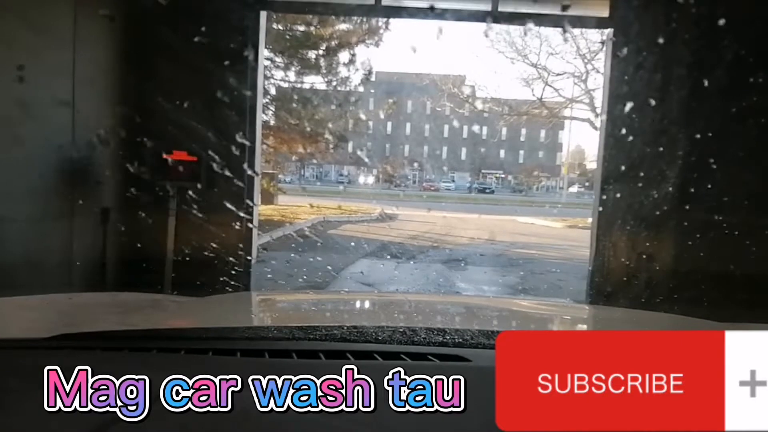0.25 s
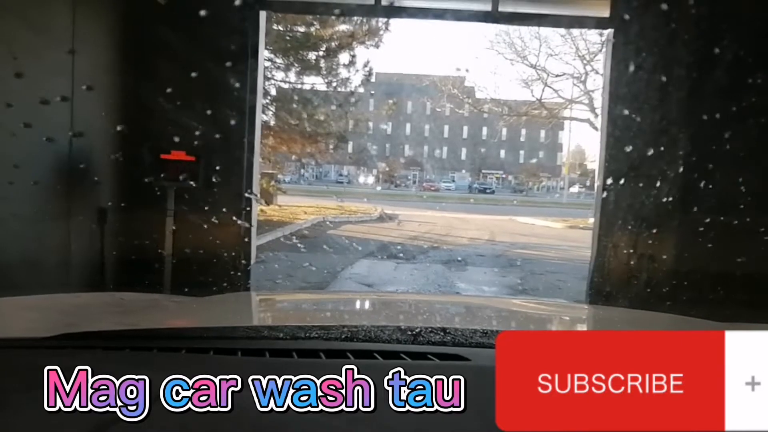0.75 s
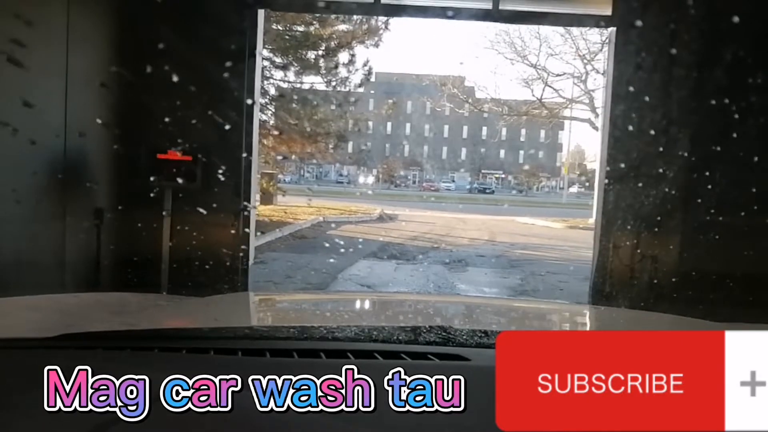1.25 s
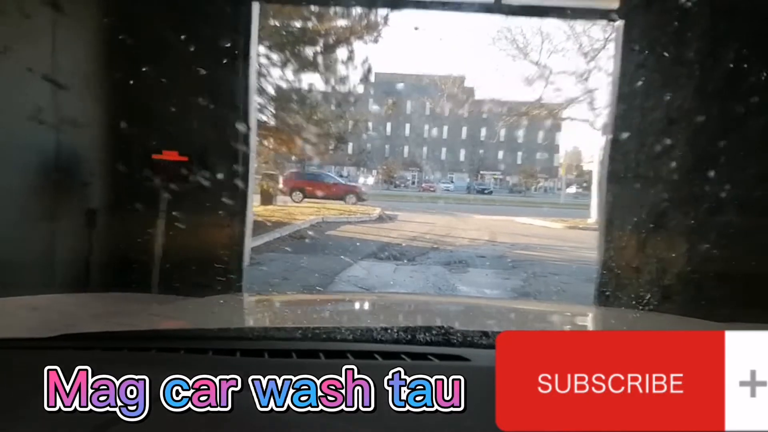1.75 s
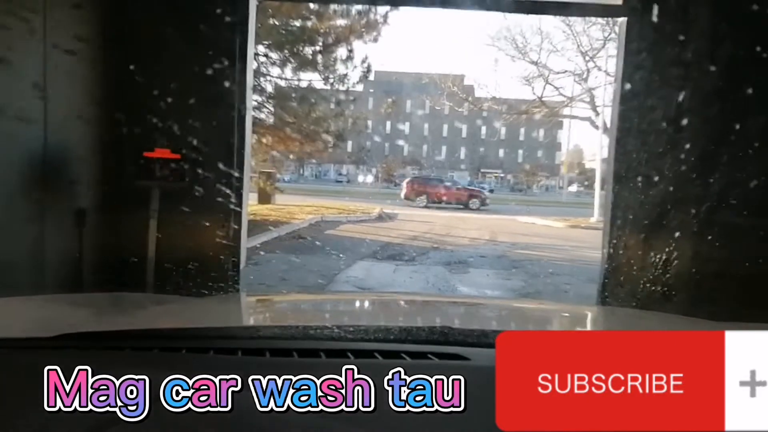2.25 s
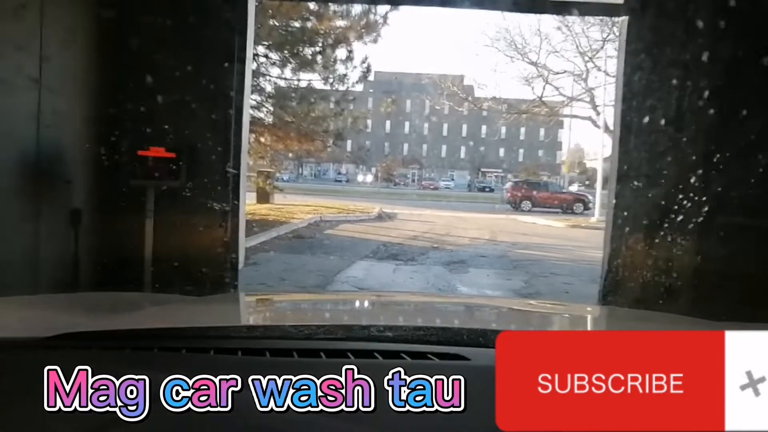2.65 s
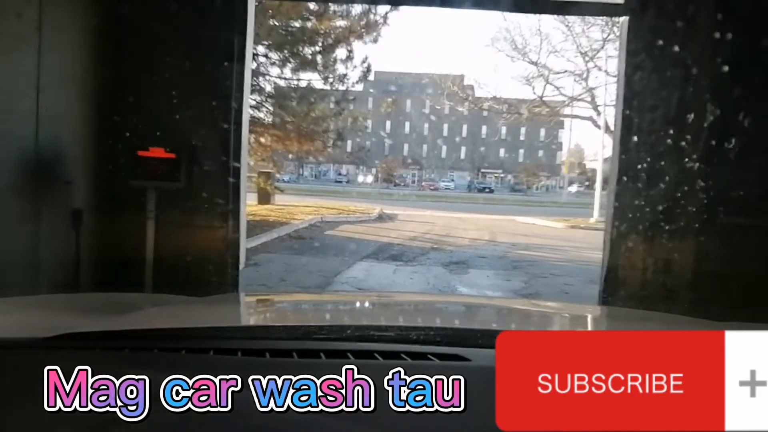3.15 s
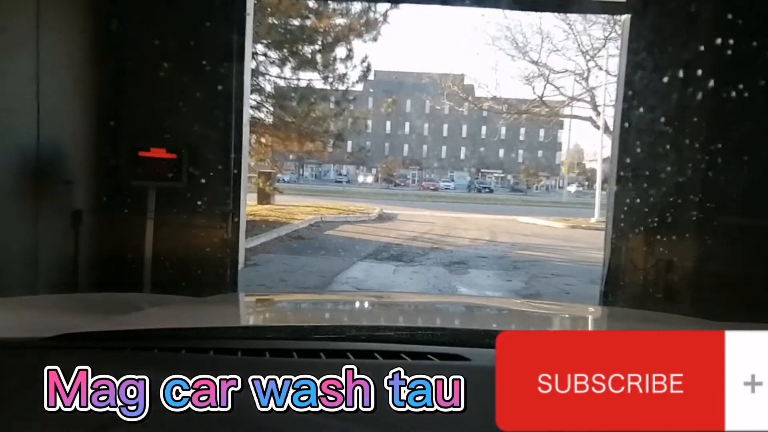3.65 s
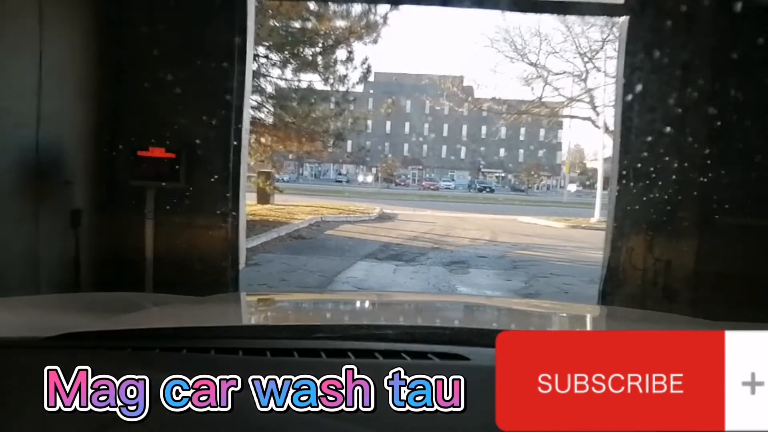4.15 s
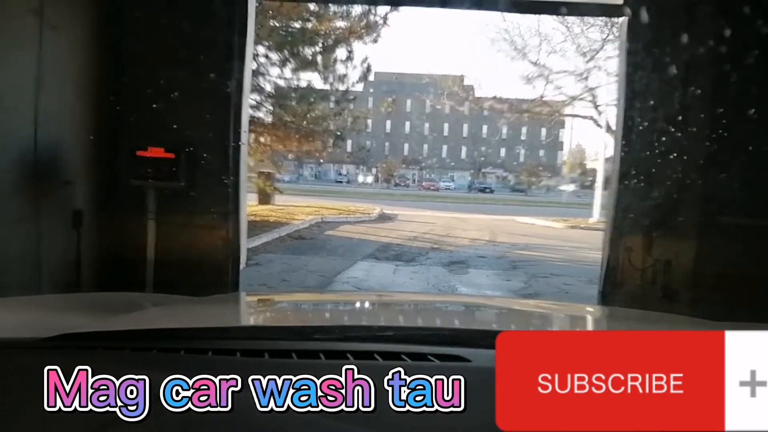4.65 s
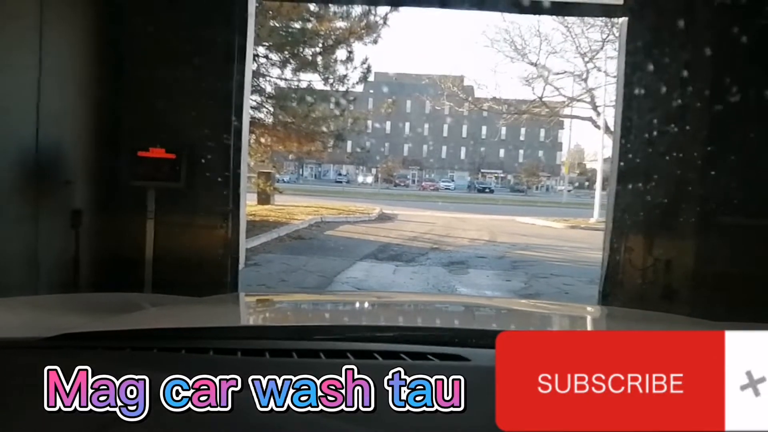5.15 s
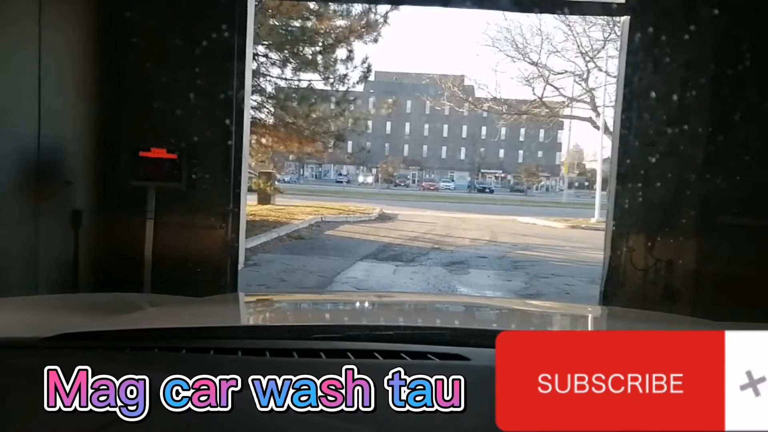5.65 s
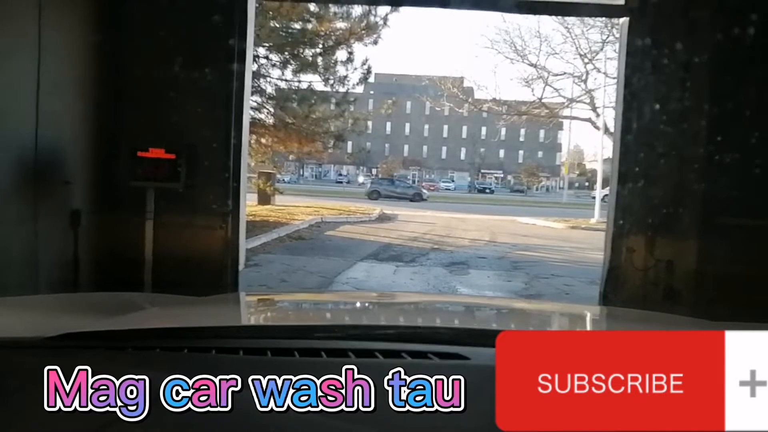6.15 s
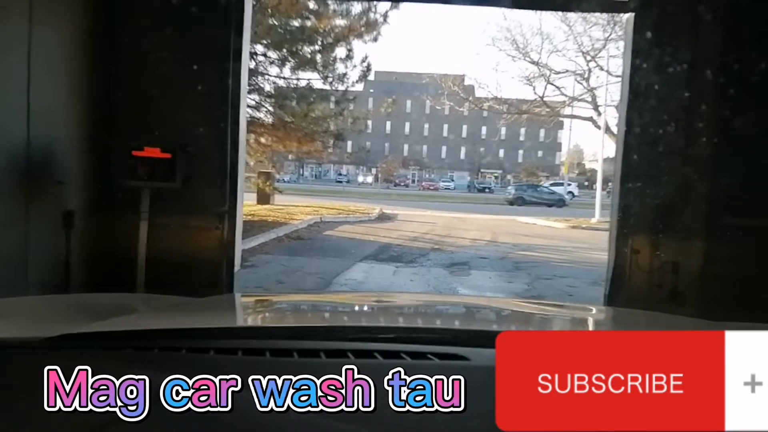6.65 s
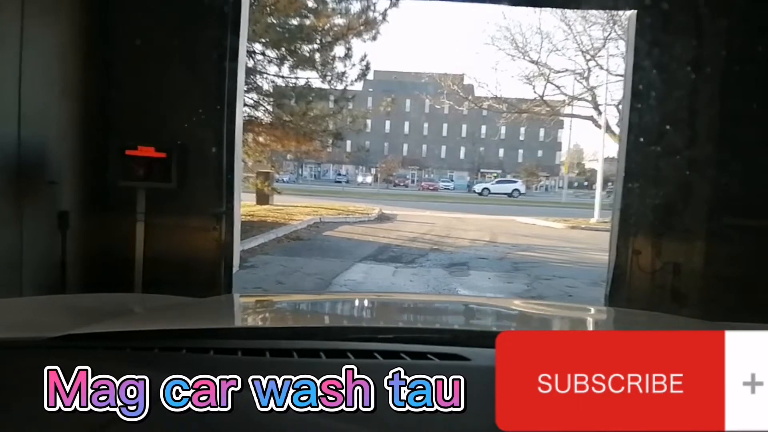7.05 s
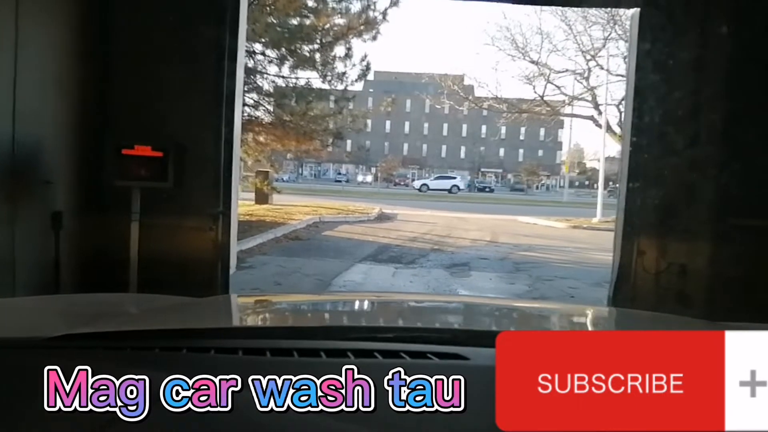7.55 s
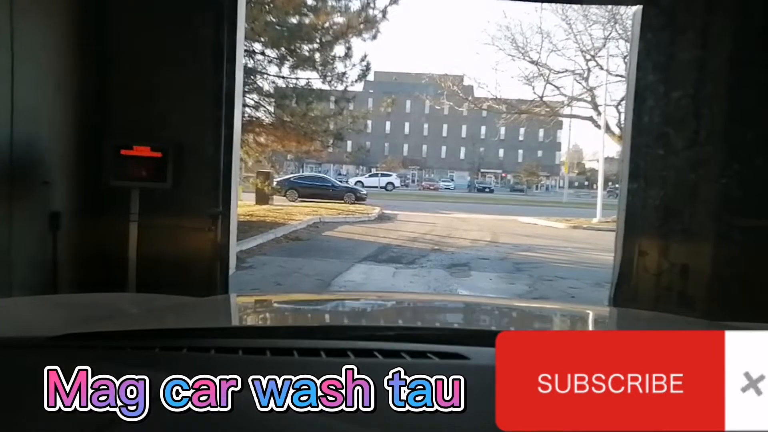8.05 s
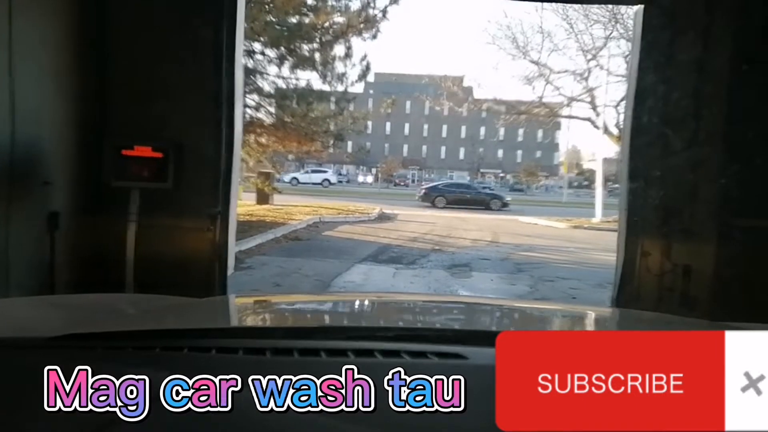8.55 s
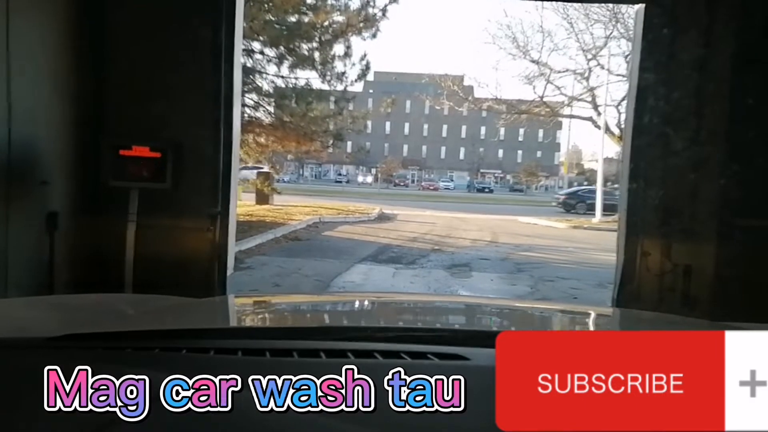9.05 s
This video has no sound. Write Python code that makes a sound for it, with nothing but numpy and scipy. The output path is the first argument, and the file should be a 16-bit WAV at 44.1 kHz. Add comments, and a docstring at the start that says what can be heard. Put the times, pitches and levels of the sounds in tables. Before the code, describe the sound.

Loud blower rush and deep cabin boom in a car wash, with fluttering gusts, faint fan hum, steady hiss and a few small dry ticks.

```python
"""Car-wash dryers heard inside a creeping car

Air jets pound the body and make the cabin boom in surges: band-shaped noise with pitched throbs.
Their gusty rush, puffs and squalls on the windscreen are noise with random gains and resonances.
Behind lie a steady hiss with a hollow ring, shaped by glass, and the fans' wavering narrow-band tone.
Small dry ticks, and a few faint rustles that lean left, are short envelopes on bright noise.
"""
import sys
import numpy as np
from scipy import signal
from scipy.fft import rfft, irfft
from scipy.io import wavfile
from scipy.ndimage import uniform_filter1d

SR = 44100
rng = np.random.default_rng(int(sys.argv[2]) if len(sys.argv) > 2 else 0)


def generate_wav(signal):
    """Clip the signal to [-1, 1] and save it as 16-bit WAV at the path in sys.argv[1]."""
    frames = np.transpose(np.atleast_2d(signal))
    scaled = np.clip(frames, -1, 1) * 32767
    pcm = np.round(scaled).astype(np.int16)
    wavfile.write(sys.argv[1], SR, pcm)


N = 409688
T, HZ = np.arange(N) / SR, np.fft.rfftfreq(N, 1 / SR)  # time (s) and frequency (Hz) axes


def amp(db):
    """Logarithmic level: decibels to amplitude gain."""
    return 10 ** (np.asarray(db) / 20)


def evened(x):
    """Normalization: scales to rms 1."""
    return x / np.sqrt(np.mean(x ** 2) + 1e-20)


def read(points):
    """Interpolation: a spectrum table on a logarithmic frequency axis."""
    hz, value = np.transpose(points)
    return np.interp(np.log(HZ + 1), np.log(hz), value)


def shape(points, fall_db=30):
    """Spectral envelope: gain of a table, falling by fall_db more per octave past its last point."""
    octaves = np.log2(np.maximum(HZ / points[-1][0], 1))
    return amp(read(points) - fall_db * octaves)


def level(rows, axis=1):
    """Amplitude envelope: gain over time from one decibel column."""
    rows = np.array(rows)
    return amp(np.interp(T, rows[:, 0], rows[:, axis]))


def peak(hz, width_hz):
    """Resonance: a bell-shaped response, width_hz wide at half its height."""
    return 1 / (1 + (2 * (HZ - hz) / width_hz) ** 2)


def bump(middle_s, half_s):
    """Gaussian envelope: a smooth swell from near 0 to 1 and back."""
    return np.exp(-np.minimum(((T - middle_s) / half_s) ** 2, 20))


# Likeness of the left and right sound fields: pitch_hz, correlation (-1 to 1)
SIDE_LIKENESS = [(20, 0.62), (50, 0.88), (140, 0.9), (205, 0.96), (235, 0.9), (280, 0.89), (330, 0.6),
                 (450, 0.65), (650, .4), (1000, 0.14), (1400, 0.063), (14000, 0.024)]


def noise(gain):
    """Interaural coherence: two partly alike channels of shaped noise, whose mean has rms 1."""
    a, b = rfft(rng.standard_normal((2, N)))
    same = np.clip(read(SIDE_LIKENESS), -1, 1)
    mid, side = a * np.sqrt(1 + same), b * np.sqrt(1 - same)
    x = irfft(np.array([mid + side, mid - side]) * gain, N)
    return x / x.mean(0).std()


def steadied(x, seconds):
    """Gain control: evens out chance swells of a noise that last longer than the given time."""
    size = max(int(seconds * SR), 8)
    power = uniform_filter1d(uniform_filter1d(x.mean(0) ** 2, size), size)
    return x / np.sqrt(abs(power) + 1e-9)


def drift(hz):
    """Random modulation: a slow curve of rms 1 that wanders at about the given rate."""
    times = T[::100]  # a coarse time grid suffices
    spectrum = rfft(rng.standard_normal(len(times)))
    curve = irfft(spectrum * peak(hz, hz)[:len(spectrum)] ** 2, len(times))
    return evened(np.interp(T, times, curve))


def gusts(hz, depth_db):
    """Amplitude modulation: a slowly wandering gain."""
    return amp(depth_db * drift(hz))


def wavering(x, hz, swing_hz):
    """Frequency modulation: the pitch of a narrow noise wanders."""
    phase = 2 * np.pi * np.cumsum(swing_hz * drift(hz)) / SR
    return (signal.hilbert(x) * np.exp(1j * phase)).real


def flutter(corner_hz, depth_db, shared):
    """Turbulence: eddies as a quick random gain of rms 1, partly common to both sides."""
    spectrum = rfft(rng.standard_normal((3, N))) * (HZ > 3) / (1 + (HZ / corner_hz) ** 2)
    eddies = irfft(spectrum, N)
    shared = np.clip(shared, 0, 1)
    sides = np.sqrt(shared) * eddies[0] + np.sqrt(1 - shared) * eddies[1:]
    return evened(amp(depth_db * evened(sides)))


def spatter(per_s, decay_s):
    """Impulse noise: a gain of rms 1 made of tiny random decaying snaps of unequal size."""
    snaps = rng.uniform(.3, 1, N) * (rng.random(N) < per_s / SR)
    return evened(signal.lfilter([1], [1, -np.exp(-1 / (decay_s * SR))], snaps))


# Resonances of glass, trim and the left microphone's port: pitch_hz, width_hz, left_db, right_db
PANES = [(620, 32, -7.5, 3), (840, 24, 0.5, 4), (885, 36, 4, 1), (930, 72, 2, -0.5), (1320, 90, -1, -1.5),
         (1357, 38, 6.5, 2.5), (1754, 280, 5.5, 1.5), (1990, 120, 4, 3), (3880, 3500, -1.5, 2),
         (9300, 650, 4.5, 0)]


def glass():
    """Resonance and comb filtering: glass, trim, the left microphone's port and cabin reflections."""
    panes = amp(sum(np.array([[left], [right]]) * peak(hz, width) for hz, width, left, right in PANES))
    taps = np.zeros((2, N))
    at = (rng.uniform(.002, .025, (2, 24)) * SR).astype(int)  # 24 reflections, 2 to 25 ms late
    np.put_along_axis(taps, at, .07 * rng.choice([-1, 1], at.shape), 1)
    return panes * abs(1 + rfft(taps) * HZ / (HZ + 500))  # reflections weaken toward the bass


# Force of the air jets on the windscreen as the car creeps under them: time_s, relative_level_db
JETS = [(0, -43), (0.25, -42), (1.6, -42.5), (1.9, -40.5), (2.5, -41), (3.1, -37.5), (3.8, -36), (4.2, -38),
        (4.55, -35.5), (5.3, -36.5), (5.8, -36.5), (6.25, -35.5), (6.8, -33), (7.3, -36.5), (7.52, -33.5),
        (7.75, -37), (8.8, -37), (9.29, -38)]


def jet_force():
    """Dynamic pressure: gain set by the force of the jets on the windscreen."""
    return level(JETS)


def blast(follow, usual_jet_db=-37):
    """Power-law coupling: gain of a layer that follows the jet force by the given share."""
    return (jet_force() / amp(usual_jet_db)) ** follow


# Air pressure on the body:
# time_s, rumble_relative_db, panel_boom_relative_db, cabin_resonance_relative_db, roof_relative_db
PRESSURE = [(0.0, -28.5, -22, -21.5, -32.5), (0.9, -29, -22.5, -24.5, -30),
            (1.3, -31.5, -19.5, -23.5, -31.0), (1.8, -30.5, -20.5, -22, -28.5),
            (2.3, -24, -17, -23.5, -31.5), (3.1, -27.5, -16, -21.5, -29.5), (3.8, -27, -17.5, -22.5, -29),
            (4.35, -28, -17, -19.5, -28.5), (4.8, -26.5, -18, -23, -28.5), (5.25, -25, -18, -25.5, -28.5),
            (5.8, -26.5, -18.5, -26, -29), (6.35, -26, -18, -21.5, -27), (6.9, -28, -16.5, -25, -27),
            (7.4, -25.5, -18.5, -24.5, -30.5), (7.75, -24, -19, -23.5, -31.5),
            (8.5, -25, -18.5, -22.5, -30.5), (9.29, -26, -18, -21.5, -30.5)]


def pressure(column):
    """Forced vibration: gain over time of one part of the body under air pressure."""
    return level(PRESSURE, column)


# Close rustles: middle_s, half_length_s, relative_level_db
RUSTLES = [(0.412, 0.25, -77), (0.775, 0.06, -74.5), (0.914, 0.077, -72.5), (1.106, 0.052, -72),
           (1.856, 0.16, -82.5), (8.03, 0.085, -79), (8.793, 0.11, -78)]
# Spectrum of the rustles: pitch_hz, relative_level_db
RUSTLE_SPECTRUM = [(2000, -29.5), (4000, -7), (6000, -2.5), (7300, 0.5), (8300, -6), (9600, 0.5),
                   (11000, -11), (13000, -12.5), (15000, -19.5)]


def rustles(rustle_db=9.5, lean_db=2.0, snap_db=-4):
    """Friction noise: faint crackly rustles, high and leaning to the left."""
    swell = sum(amp(db) * bump(s, half) for s, half, db in RUSTLES)
    crackle = evened(1 + amp(snap_db) * spatter(per_s=280, decay_s=.0012))
    grain = noise(shape(RUSTLE_SPECTRUM)) * crackle
    return amp(rustle_db) * swell * grain * amp([[lean_db], [-lean_db]])


# Close ticks: start_s, level_db, decay_s
TICKS = [(0.273, -50, .004), (0.2875, -39.5, .004), (0.2905, -38.5, 0.007), (0.411, -60, .004),
         (0.543, -62, .004), (1.088, -55, .007)]
# Spectrum of the ticks: pitch_hz, relative_level_db
TICK_SPECTRUM = [(1000, -8), (2050, 2), (2600, -3), (3300, -6), (3650, 3.5), (3900, 3), (4200, -9),
                 (5500, -6), (6600, -12), (7700, -9), (8400, -13), (9400, -5), (10500, -7.5), (12000, -16),
                 (14000, -22)]


def ticks(rise_s=0.00032):
    """Transient excitation: small dry ticks with a sharp rise and an exponential decay."""
    swell = np.zeros(N)
    for s, db, decay_s in TICKS:
        rise = np.clip((T - s) / rise_s, 0, 1)
        swell += amp(db) * rise * np.exp(-np.minimum(abs(T - s) / decay_s, 50))
    return swell * noise(shape(TICK_SPECTRUM))


# Level of the fans' blade tone: time_s, level_db
FAN = [(0, -52), (0.25, -35), (1.0, -39), (1.15, -43.5), (1.5, -41.5), (1.95, -50.5), (2.15, -35.5),
       (2.6, -42), (3.0, -34.5), (3.4, -40.5), (3.8, -37.5), (4.2, -52.5), (5.05, -36), (5.3, -39),
       (5.7, -42), (6.0, -41), (6.5, -33), (6.95, -39.5), (7.17, -34.5), (7.42, -55.5), (7.65, -37.5),
       (8.0, -42), (8.8, -48), (9.05, -35), (9.29, -53)]
FAN_HZ, FAN_WIDTH_HZ, FAN_SKIRT_HZ = 525, 9, 70


def fans(unlike=0.38, skirt_db=-15):
    """Beating: fans at nearly one speed, as a narrow noise whose tone wavers unlike on each side."""
    line = peak(FAN_HZ, FAN_WIDTH_HZ)
    skirt = amp(skirt_db) * peak(FAN_HZ, FAN_SKIRT_HZ)
    left, right = noise(line + skirt)
    tone = steadied(np.array([left, right - unlike * left]), 0.22)
    return wavering(tone, hz=8, swing_hz=3) * gusts(hz=15, depth_db=1.5) * level(FAN)


# Spectrum of the nozzle hiss: pitch_hz, relative_level_db
HISS = [(300, 0), (500, 11), (700, 9), (1200, 4), (2200, 0), (2800, -3.5), (3500, -4.5), (4600, -10),
        (5700, -11.5), (6200, -18), (7700, -21.5), (8350, -28), (9500, -26.5), (12000, -37)]
# Level of the nozzles' hollow ring, before its lean to the right: time_s, level_db
RING = [(0, -65), (0.45, -61), (1.0, -61.5), (1.55, -56), (2.08, -52.5), (2.25, -59), (3.6, -63),
        (4.25, -65), (4.6, -59), (5.8, -63), (6.6, -58.5), (7.6, -58), (8.4, -57.5), (9.29, -57)]
RING_HZ, RING_WIDTH_HZ = 2760, 600  # the response is squared, so the band is narrower
# one nozzle draws near: its hiss builds slowly and drops as the car passes it
SWEEP_AT_S, SWEEP_RISE_S, SWEEP_FALL_S = 2.06, 0.63, 0.2


def hiss(hiss_db=-45.0, follow=0.18, sweep_db=3.0, ring_lean_db=2.0):
    """Jet noise: the nozzles give a smooth hiss, coloured by the glass, and a hollow ring."""
    sweep = bump(SWEEP_AT_S, np.where(T < SWEEP_AT_S, SWEEP_RISE_S, SWEEP_FALL_S))
    air = amp(hiss_db + sweep_db * sweep) * noise(shape(HISS) * glass()) * blast(follow)
    ring = noise(peak(RING_HZ, RING_WIDTH_HZ) ** 2) * level(RING)
    both = air + ring * amp([[-ring_lean_db], [ring_lean_db]])
    return both * flutter(corner_hz=40, depth_db=1.0, shared=0.99) * gusts(hz=4.4, depth_db=0.57)


# Spectrum of the drumming roof and bonnet: pitch_hz, relative_level_db
ROAR = [(220, -14), (300, -2), (350, 2.5), (395, -1), (430, -0.4), (490, -7.5), (600, -8.5), (900, -25.5)]


def roar(roar_db=-1.0, follow=0.1):
    """Flow-induced vibration: the air drums on roof and bonnet, more fully under the strongest jets."""
    return amp(roar_db) * steadied(noise(shape(ROAR)), 0.41) * pressure(4) * blast(follow)


# Spectrum of the air rush: pitch_hz, relative_level_db
RUSH = [(250, -18.5), (450, -1.5), (580, 0), (740, -3), (980, -4), (1200, -11), (1420, -11.5),
        (1700, -19.5), (2100, -18.5), (3000, -24.5), (6000, -48.5)]


def rush(rush_db=2.0):
    """Turbulent flow: air tears over the windscreen in quick irregular bursts."""
    air = noise(shape(RUSH) * glass()) * flutter(corner_hz=129, depth_db=2.0, shared=0.7)
    return amp(rush_db) * steadied(air, 0.32) * gusts(hz=22, depth_db=0.72) * jet_force()


# Hard slaps of air on the windscreen: mid_rise_s, relative_peak_db
SLAPS = [(1.539, -31), (1.838, -29), (2.69, -27), (3.205, -27), (3.667, -23), (3.866, -24), (4.467, -20),
         (4.638, -22), (5.011, -25), (5.32, -24.5), (5.434, -24.5), (5.827, -26), (6.779, -23.5),
         (6.915, -21.5), (7.124, -18), (7.422, -19.5), (7.766, -25), (8.183, -23), (8.446, -26),
         (8.792, -24), (8.983, -24)]


def slaps(rise_s=.0032, slap_db=-5):
    """Impulsive loading: the largest eddies hit the glass as short puffs."""
    swell = np.zeros(N)
    for s, db in SLAPS:
        age = np.maximum(T - s + rise_s / 2, 0) / rise_s
        swell += amp(db) * age * np.exp(1 - np.minimum(age, 50))  # peaks at age 1
    puff = steadied(noise(shape(RUSH) * peak(1200, 1600)), 0.0045)
    return amp(slap_db) * swell * puff


# Full gusts on the windscreen: middle_s, half_length_s, level_db
SQUALLS = [(3.21, 0.16, -49), (3.75, 0.27, -41), (4.47, 0.12, -41), (4.7, 0.16, -38.5), (5.024, 0.049, -39),
           (5.19, .14, -42.5), (6.277, 0.081, -40), (6.801, 0.3, -36), (7.154, .09, -36.5),
           (7.543, 0.053, -34), (8.185, 0.027, -42), (8.8, 0.037, -38.5)]
# Resonances of the windscreen: pitch_hz, width_hz, relative_level_db
WINDSCREEN = [(600, 120, -6.5), (800, 23, -4), (910, 48, -0.5), (960, 160, -1.5), (1410, 280, -13),
              (2600, 1600, -24)]


def squalls():
    """Modal excitation: coarse gusts ring the windscreen, at a pitch that shifts with the stream."""
    swell = sum(amp(db) * bump(s, half) for s, half, db in SQUALLS)
    modes = sum(amp(db) * peak(hz, width) for hz, width, db in WINDSCREEN)
    ringing = wavering(noise(modes), hz=5, swing_hz=14)
    coarse = ringing * flutter(corner_hz=28, depth_db=3.0, shared=0.84)
    return swell * steadied(coarse, 0.098)


# Spectrum of the deep rumble: pitch_hz, relative_level_db
RUMBLE = [(14, -30), (21, -18), (27, -18.5), (42, -.5), (50, -2), (58, 1.5), (68, -2.5), (86, 4.5), (95, 0),
          (108, -16)]
# Spectrum of the panel boom: pitch_hz, relative_level_db
BOOM = [(80, -22), (98, -3.5), (118, 1.3), (135, -1.5), (150, -.3), (178, -3.5), (200, -7), (244, -5.5),
        (262, -8), (281, -6.5), (298, -12), (320, -19.5), (450, -36)]
# Air resonances of the cabin: pitch_hz, width_hz, relative_level_db
CABIN = [(198.7, 26, -3.5), (212, 33, -4)]
# Side from which the body booms as the jets cross the car: time_s, left_minus_right_db
BOOM_LEAN = [(0, -0.5), (0.8, 1.0), (1.3, -0.5), (2.0, -0.3), (2.7, -3), (3.25, 0), (3.8, -1.3),
             (5.7, -2.4), (6.25, -0.2), (7.0, -1.7), (9.29, -1.5)]
PANELS_BELOW_HZ = 200


def body(rumble_db=4.5, boom_db=-0.48, roof_db=6.5, cabin_db=1.12):
    """Forced vibration and cavity resonance: the jets shake the panels and the cabin air booms."""
    rumble = amp(rumble_db) * steadied(noise(shape(RUMBLE)), 0.19) * pressure(1)
    # lower and upper boom are steadied apart: the upper part keeps slower swells
    low = 1 / (1 + (HZ / PANELS_BELOW_HZ) ** 10)
    boom = amp(boom_db) * steadied(noise(shape(BOOM) * np.sqrt(low)), 0.26) * pressure(2)
    roof = amp(roof_db) * steadied(noise(shape(BOOM) * np.sqrt(1 - low)), 0.42) * pressure(4)
    modes = sum(amp(db) * peak(hz, width) for hz, width, db in CABIN)
    cabin_air = wavering(steadied(noise(modes), 0.15), hz=3, swing_hz=5)
    ringing = amp(cabin_db) * cabin_air * pressure(3)
    lean = np.sqrt(level(BOOM_LEAN))  # half of the decibels on each side
    return rumble + (boom + roof + ringing) * np.array([lean, 1 / lean])


# Throbs of the cabin under large eddies:
# middle_s, half_length_s, pitch_hz, glide_hz_per_s, level_db
SURGES = [(0.55, .05, 124, 0, -17), (1.02, .03, 211, 300, -14), (1.15, .03, 205, -300, -11.5),
          (1.25, .03, 214, 0, -13), (1.45, .1, 275, 0, -20), (1.67, .045, 202, -300, -13),
          (1.9, .03, 205, 0, -12.5), (2.02, .03, 208, 300, -12), (2.2, .04, 118, 0, -13.5),
          (2.47, .03, 214, 0, -10), (2.69, .03, 199, 0, -9.5), (2.83, .045, 214, 0, -12.5),
          (2.95, .05, 116, 0, -13.5), (3.02, .03, 220, 0, -12), (3.14, .03, 202, -300, -11),
          (3.39, .03, 211, 0, -12), (3.55, .035, 199, -200, -9), (3.61, .03, 120, 0, -10),
          (3.82, .07, 52, 0, -20), (4.08, .035, 118, 0, -9), (4.1, .03, 217, 0, -11),
          (4.18, .045, 148, 0, -11.5), (4.23, .045, 115, 0, -11.5), (4.25, .05, 86, 0, -13.5),
          (4.31, .03, 208, 0, -10), (4.41, .03, 193, 0, -11), (4.68, .03, 205, 0, -11),
          (5.09, .03, 112, 0, -9.5), (5.1, .045, 214, 130, -11.5), (5.21, .045, 211, -300, -8.5),
          (5.26, .06, 92, 0, -13.5), (5.39, .03, 142, -300, -10.5), (5.42, .035, 196, -100, -9),
          (5.49, .045, 98, 0, -13), (5.63, .03, 208, 0, -9), (5.8, .1, 124, 200, -13.5),
          (5.93, .05, 210, 700, -12.5), (6.04, .03, 211, 0, -12), (6.48, .03, 199, 0, -11),
          (6.59, .03, 208, -300, -11), (6.77, .03, 199, 0, -12), (6.87, .045, 211, 0, -11.5),
          (7.2, .03, 205, 0, -10.5), (7.38, .03, 211, 0, -11), (8.15, .1, 45, 0, -22),
          (8.19, .03, 187, 0, -10.5), (8.55, .03, 217, 0, -13.5), (8.86, .07, 52, 0, -17),
          (8.97, .03, 154, 0, -11.5), (9.08, .035, 88, 0, -10.5), (9.14, .09, 42, 0, -16)]


def surges(boom):
    """Resonant response: a large eddy catches the boom at one pitch and shapes a brief throb."""
    out = boom.copy()
    for s, half, hz, glide, db in SURGES:
        near = abs(T - s) < 3 * half
        t = T[near] - s
        swell = np.exp(-(t / half) ** 2)
        throb = swell * np.exp(2j * np.pi * (hz * t + glide * t ** 2 / 2))
        # strength and phase with which the air already swings at this pitch
        swing = 2 * np.vdot(throb, out[:, near].mean(0)) / np.sum(swell ** 2)
        change = amp(db) / abs(swing) - 1  # brings that swing to the level of the throb
        out[:, near] += (change * swing * throb).real
    return out


def scene():
    """Superposition: everything that is heard from the front seat."""
    jets = surges(body()) + roar() + rush() + squalls() + slaps()
    return jets + hiss() + fans() + rustles() + ticks()


def record(dry, knee=.6, ceiling=.92, edge_hz=15000):
    """Soft saturation and band limiting: rounds peaks above the knee and cuts the highest treble."""
    over = np.maximum(abs(dry) - knee, 0)
    rounded = (ceiling - knee) * np.tanh(over / (ceiling - knee))
    soft = np.clip(dry, -knee, knee) + np.sign(dry) * rounded
    low_pass = signal.firwin(511, edge_hz, window=("kaiser", 9), fs=SR)
    return signal.oaconvolve(soft, low_pass[None], "same")


dry = scene()
out = record(dry)
generate_wav(out)
```